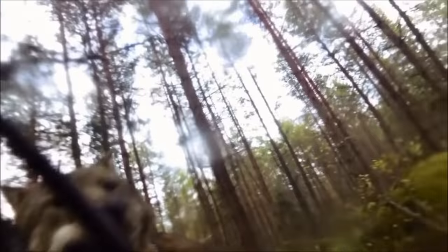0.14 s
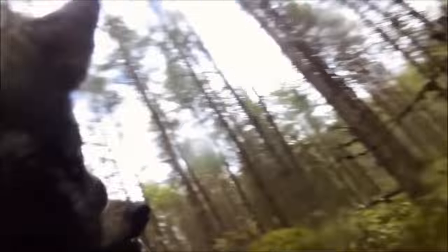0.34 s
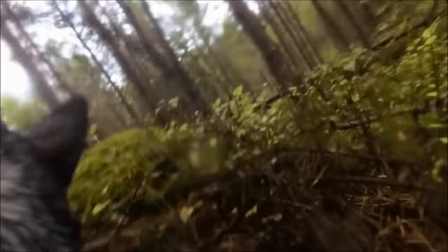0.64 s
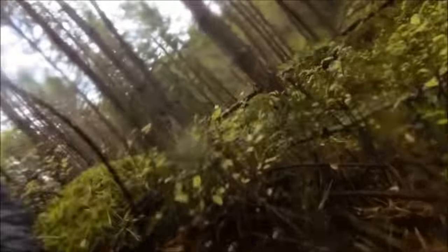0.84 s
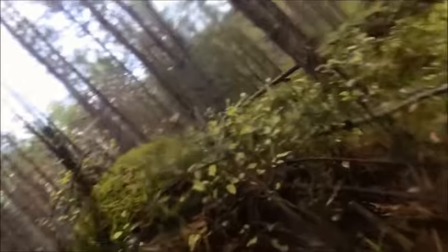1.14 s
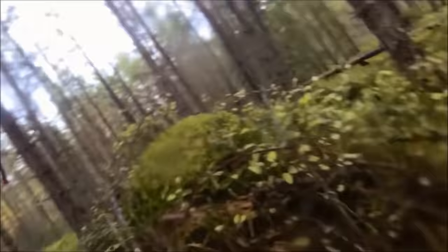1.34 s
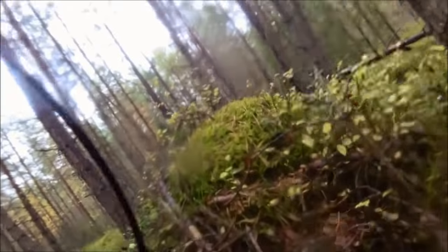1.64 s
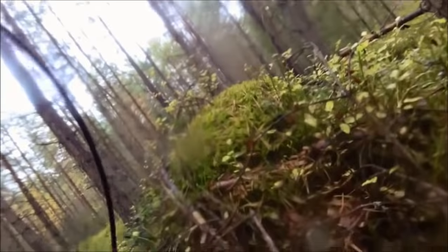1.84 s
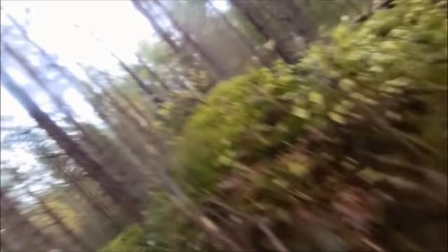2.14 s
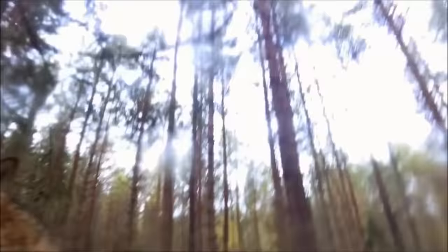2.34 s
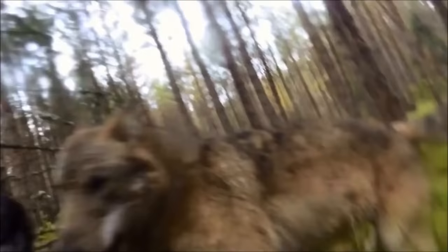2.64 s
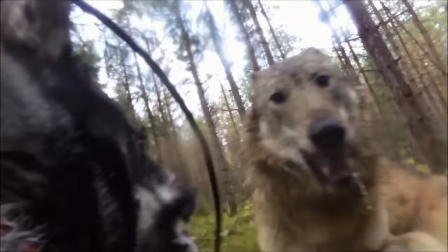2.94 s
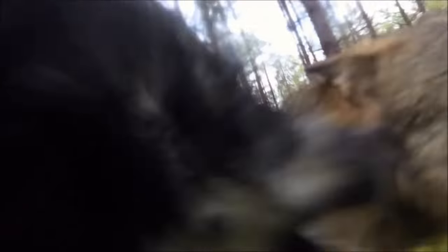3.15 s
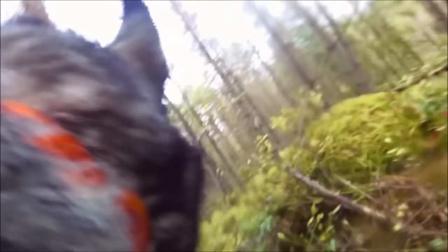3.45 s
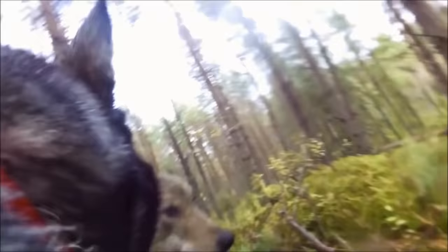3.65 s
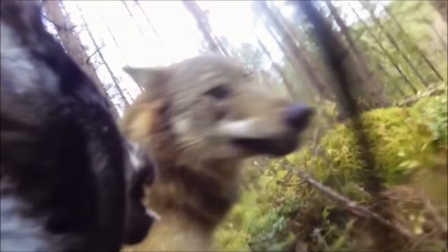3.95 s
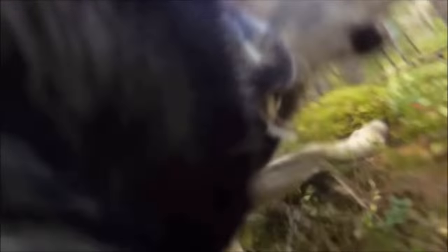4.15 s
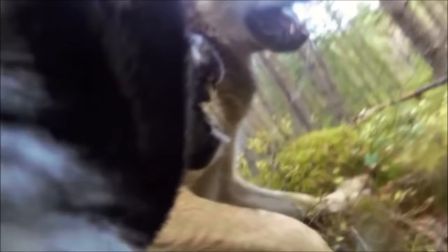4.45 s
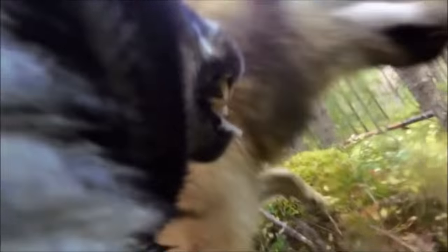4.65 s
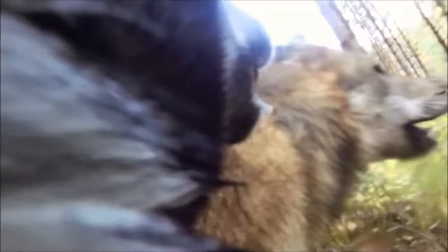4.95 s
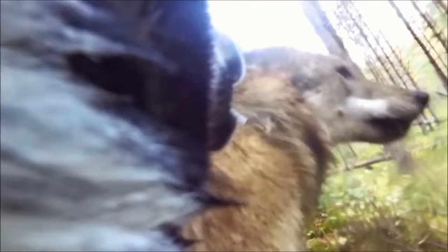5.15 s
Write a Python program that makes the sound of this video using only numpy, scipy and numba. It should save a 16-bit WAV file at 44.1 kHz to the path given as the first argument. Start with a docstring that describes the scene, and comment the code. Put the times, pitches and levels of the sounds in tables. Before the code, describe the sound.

A harness knocks and scrapes against the microphone as a dog moves through forest undergrowth, while a nearby wolf gives low, muffled growls.

```python
"""A dog's harness knocks on the case of the small camera it carries through forest undergrowth.
Blows ring the shell and back panel; paws and shoulders thump through the mount; strap, fur and
buckle rub by stick-slip friction, twigs snap and leaves crackle. A wolf close by gives three low,
muffled growls and two grunts. A fast limiter flattens the hardest knocks."""
import sys
import numpy as np
from scipy import signal
from scipy.fft import rfft, irfft
from scipy.io import wavfile
from scipy.ndimage import uniform_filter1d, minimum_filter1d
from numba import njit

SR = 44100
rng = np.random.default_rng(int(sys.argv[2]) if len(sys.argv) > 2 else 0)


def unload_wav(signal):
    """Save mono or channel-first audio to the path in sys.argv[1] as 16-bit WAV at rate SR, clipped to [-1, 1]."""
    wavfile.write(
        sys.argv[1],
        SR,
        np.round(np.clip(np.atleast_2d(signal).T, -1, 1) * 32767).astype(np.int16),
    )


N = 233447
TIME = np.arange(N) / SR

# colour of the stiff case shell: f/Hz, level/dB
SHELL = [(300, -19.5), (1800, -6.5), (2800, -3), (3250, 2.5), (3950, -1.5), (4500, -13.5), (7400, -41),
         (12000, -68)]
# colour of scraping on the case: f/Hz, level/dB
SCRAPE = [(200, -18), (1050, -10), (1450, -0.5), (2500, -4), (3300, 4.5), (4000, -1), (4700, -20.5),
          (6500, -31), (8300, -64)]
# colour of soft flesh and fur: f/Hz, level/dB
FLESH = [(110, -12), (330, 5), (800, -4.5), (4000, -42.5)]
# colour of the hollow between case and coat: f/Hz, level/dB
HOLLOW = [(150, -6), (400, 9.5), (740, -3), (1050, -11), (1450, -11), (1900, -30.5)]


def knocks(hard_db=-8, fall_power=1.32, tail_db=-32, tail_s=0.01, size=4096):
    """Each harness contact chatters for a few ms and rings the stiff shell and the broad back panel."""
    # colour of the back panel: f/Hz, level/dB
    panel_colour = [(150, -17), (1020, -12.5), (1380, 4.5), (1800, -10.5), (6000, -74.5)]
    out, t = np.zeros(N), np.arange(size) / SR
    padding = response(FLESH)
    for s, shell_db, panel_db, length_s in contacts():
        shell, panel = response(struck(SHELL)), response(struck(panel_colour))
        force = np.exp(-.5 * (t / length_s) ** fall_power) + undb(tail_db) * np.exp(-t / tail_s)
        hardness = undb(.5 * (panel_db - hard_db))  # fur cushions light blows; hard ones reach the panel
        for body, db in ((shell, shell_db), (hardness * panel + .5 * padding, panel_db)):
            ring = signal.fftconvolve(force * rng.choice([-1, 1], size), body)
            add(out, s, ring * undb(db) * np.sqrt(length_s * SR / np.sum(ring ** 2)))
    return out


def contacts(contact_s=0.0015, doubling_db=50):
    """Blows and rebounds as t/s, shell/dB, panel/dB, length/s; harder blows press for longer."""
    # harness blows: t/s, shell level/dB, panel re shell/dB, rebound delay/s (0 = none)
    blows = [(0.103, -25.5, -4.5, 0.004), (0.416, 6, -11.5, 0.0099), (0.527, 0, -15.5, 0.012),
             (0.791, -17.5, -0.5, 0.0032), (0.845, -16, -18, 0.011), (0.986, -21.5, -17, 0.00077),
             (1.204, -17, -2.5, 0.0063), (1.626, -21.5, -2, 0.0029), (1.658, -15.5, 1, 0.0058),
             (1.858, -22.5, 5, 0.0065), (2.2377, -22, 2, 0.0032), (2.5403, -22, -3, 0.01),
             (2.744, -17, -10, 0.0038), (2.9001, -4, -12.5, 0.0037), (3.254, 7, -4, 0.011),
             (3.3584, 22.5, -6.5, 0.0089), (3.4172, -7, -7.5, 0.0027), (3.493, -2, 0, 0.0084),
             (3.971, 3, -7, 0.00021), (4.2265, 0.5, -2, 0.0086), (4.2789, 1.5, -1.5, 0.015),
             (4.3712, -15, -1.5, 0.0027), (4.472, -5, -12, 0.0055), (4.4905, -13.5, -7.5, 0.00077),
             (4.5436, -2, -6, 0), (4.5625, -7.5, -4.5, 0.0087), (4.586, -24, 0, 0.0019)]
    for s, db, panel_db, delay_s in blows:
        length_s = contact_s * 2 ** (db / doubling_db)
        yield s, db, db + panel_db, length_s
        if delay_s > 0:  # a rebound lands flatter: boxier, longer
            yield s + delay_s, db, db + panel_db + 2.5, length_s * 1.193


def thumps(gain_db=-1, swell_s=0.0017, sag=0.43, scuff_db=-12, size=4000):
    """A soft push swells and dies within a few cycles, sinking in pitch as the strap slackens."""
    # paw and shoulder blows through the mount: t/s, mid-glide f/Hz, level/dB
    pushes = [(0.428, 163, -2), (0.541, 194, -13), (0.688, 464, -6), (1.203, 437, -13), (1.497, 138, -8.5),
              (1.668, 185, -2.5), (1.867, 260, -7.5), (2.318, 142.4, -4), (2.424, 225, 0),
              (2.54, 410, -5.5), (2.904, 163.1, -9.5), (3.255, 200.6, -7), (3.397, 220.5, -6.5),
              (3.976, 179.4, -10.5)]
    out, t = np.zeros(N), np.arange(size) / SR
    for s, hz, db in pushes:
        age = t / swell_s * (hz / 200) ** 0.37  # higher blows are shorter
        pitch_hz = hz * (1 + sag * (2 * np.exp(-age / 2) - 1))
        phase = 2 * np.pi * np.cumsum(pitch_hz) / SR
        scuff = undb(scuff_db) * through(rng.standard_normal(size), FLESH)
        add(out, s, undb(db + gain_db) * age * np.exp(1 - age) * (np.sin(phase) + scuff))
    return out


def snaps(gain_db=-6, decay_s=0.002, size=2048):
    """A twig splinters for a moment and rings only the stiff shell."""
    # twigs breaking against the case: t/s, level/dB
    twigs = [(0.662, -21), (0.7604, -19), (0.7657, -3.5), (1.474, -13.5), (1.5638, -15.5), (1.772, -21.5),
             (1.8, -17.5), (2.351, -11), (2.6458, -18.5), (2.704, -10.5), (3.2891, -12.5), (3.4474, -7),
             (3.5339, -7.5), (3.5442, -6.5), (3.5686, -10.5), (3.7164, -21.5), (4.152, -19)]
    out, t = np.zeros(N), np.arange(size) / SR
    for s, db in twigs:
        crack = through(rng.choice([-1, 1], size) * np.exp(-t / decay_s), struck(SHELL))
        add(out, s, undb(db + gain_db) * crack / np.sqrt(np.sum(crack ** 2) / (decay_s * SR)))
    return out


def booms(t60_s=0.077, size=6000):
    """Air trapped between case and coat rings at one hollow pitch."""
    # square blows: t/s, f/Hz, level/dB
    blows = [(3.502, 274, -7.5), (4.57, 385, -12)]
    out, t = np.zeros(N), np.arange(size) / SR
    for s, hz, db in blows:
        add(out, s, undb(db - 60 * t / t60_s) * np.sin(2 * np.pi * hz * t))
    return out


def pings(detune=.008, size=16000):
    """A struck metal harness ring sings briefly; each mode beats against a weaker twin."""
    # strikes on the ring: t/s, level/dB
    strikes = [(2.901, -38), (3.266, -32), (3.973, -31), (4.24, -38)]
    # ring modes: f/Hz, level/dB, t60/s
    modes = [(2565, -1, 0.18), (3070, 6, .12)]
    out, t = np.zeros(N), np.arange(size) / SR
    for s, db in strikes:
        for hz, mode_db, t60_s in modes:
            twin_hz = hz * (1 + detune * rng.standard_normal())
            pair = np.sin(2 * np.pi * hz * t) + .5 * np.sin(2 * np.pi * (twin_hz * t + rng.random()))
            add(out, s, undb(db + mode_db - 60 * t / t60_s) * pair)
    return out


def scrapes(rub_db=-22, shell_db=-8):
    """Gritty, uneven slips scratch the case; the coarsest tick on its shell."""
    # strap and twig strokes: crest t/s, length/s, level/dB
    scratches = [(0.44, 0.052, -24.5), (0.61, 0.051, -17), (0.728, 0.055, -38), (0.84, 0.048, -35.5),
                 (1.475, 0.039, -37), (2.329, 0.039, -30.5), (2.405, 0.032, -19), (2.461, 0.029, -17.5),
                 (3.425, 0.098, -27)]
    pressure = strokes(scratches)
    friction = bounce(slips(rate_hz=6000, spread_db=2.5) * undb(2.5 * walk(rate_hz=250)))
    ticks = through(slips(rate_hz=450, spread_db=2) * pressure, SHELL)
    rub = through(rng.standard_normal(N) * np.sqrt(pressure), HOLLOW)
    return through(friction * pressure, SCRAPE) + undb(shell_db) * ticks + undb(rub_db) * rub


def grinds(bite_s=.001, release_s=.008, ease_db=-5):
    """A buckle bites at once, judders along the case as the pressure eases, and lets go."""
    # buckle catches: start t/s, length/s, level/dB
    catches = [(3.364, 0.027, -14.5), (3.508, 0.018, -15.5), (4.314, 0.046, -13)]
    # colour of the grinding buckle: f/Hz, level/dB
    buckle_colour = [(950, -5), (1480, 4.5), (2300, -7.5), (3500, 3.5), (6400, -20), (8000, -48)]
    pressure = 0
    for s, length_s, db in catches:
        gate = np.clip(np.minimum((TIME - s) / bite_s, (s + length_s - TIME) / release_s + .5), 0, 1)
        progress = np.clip((TIME - s) / length_s, 0, 1)
        pressure = pressure + gate * undb(db + ease_db * progress ** 2)
    judder = bounce(slips(rate_hz=5000, spread_db=1.5) * undb(2 * walk(rate_hz=400)))
    return through(judder * pressure, buckle_colour)


def brushes(rub_db=-15, cutoff_hz=4400):
    """Countless soft hairs swish over the case; light strokes are mostly a dull, hollow rub."""
    # fur strokes: crest t/s, length/s, level/dB
    sweeps = [(4.517, 0.021, -31.5), (4.597, 0.041, -35), (4.722, 0.072, -17), (4.822, 0.043, -31),
              (4.955, 0.057, -27), (5.025, 0.053, -28), (5.198, 0.041, -29)]
    pressure = strokes(sweeps)
    lowpass = signal.butter(3, cutoff_hz, fs=SR, output="sos")
    hairs = signal.sosfilt(lowpass, bounce(rng.standard_normal(N)))
    rub = through(bounce(rng.standard_normal(N)) * np.sqrt(pressure), HOLLOW)
    return through(hairs * pressure, SCRAPE) + undb(rub_db) * rub


def growls(third_db=-30, slope_db=-5.5, rasp_db=-17, jitter=.02, shimmer_db=1.4, fade_s=0.015):
    """Low, muffled wolf growls with two strong harmonics; the folds flutter and rasp once a cycle."""
    # one contour per growl: t/s, f/Hz, level/dB, octave re fundamental/dB
    contours = [
        [(2.79, 143.1, -43, 1), (2.92, 126.4, -47.5, 15), (3.01, 120.6, -39, 1), (3.10, 131.4, -37.5, -2),
         (3.26, 111.5, -35.5, -4.5)],
        [(3.65, 152.1, -38.5, -16), (3.74, 141, -33.5, -4.5), (3.81, 116.7, -36, 3), (4.00, 72.4, -33, -55),
         (4.04, 68.96, -53, -38)],
        [(4.765, 124.3, -45, 8.5), (4.95, 145.1, -32.5, -0.5), (5.05, 159.9, -35, 0), (5.12, 132.1, -36, 1),
         (5.19, 155, -35.5, 0.5), (5.285, 131.5, -34, 4)],
    ]
    out = np.zeros(N)
    for contour in contours:
        knots_s, *columns = np.transpose(contour)
        hz, db, octave_db = [np.interp(TIME, knots_s, column) for column in columns]
        phase = 2 * np.pi * np.cumsum(hz * (1 + jitter * walk(rate_hz=63))) / SR
        upper = sum(undb(third_db + slope_db * k) * np.sin((k + 3) * phase) for k in range(7))
        overtones = np.sin(2 * phase) + upper + undb(rasp_db) * rasp(phase)
        voice = np.sin(phase) + undb(octave_db) * overtones
        gate = np.clip(np.minimum(TIME - knots_s[0], knots_s[-1] + fade_s - TIME) / fade_s, 0, 1)
        out += np.sqrt(2) * voice * gate * undb(db + shimmer_db * walk(rate_hz=130))
    return out


def grunts(rasp_db=-10):
    """A brief, husky hum swells and fades as its pitch slides."""
    # muffled wolf grunts: start t/s, length/s, start f/Hz, glide/(octaves per s), level/dB
    hums = [(0.857, 0.043, 302, -7, -22.5), (1.716, 0.056, 240.4, 4, -24.5)]
    out = np.zeros(N)
    for s, length_s, hz, glide, db in hums:
        t = np.arange(int(length_s * SR)) / SR
        phase = 2 * np.pi * np.cumsum(hz * 2 ** (glide * t)) / SR
        voice = np.sin(phase) + undb(rasp_db) * rasp(phase)
        add(out, s, undb(db) * np.sin(np.pi * t / length_s) * voice)
    return out


def movement(sway_db=-46.5, jolt_db=3.5, twig_db=-8):
    """The dog's body rumbles through the mount; leaves crackle in flurries and dry twigs tick."""
    # steps, lunges and weight shifts: crest t/s, length/s, rumble level/dB, leaf level/dB
    moves = [(0.028, 0.21, -40, -48), (0.447, 0.19, -25.5, -35.5), (0.753, 0.19, -20, -30.5),
             (0.984, 0.028, -24.5, -49), (1.204, 0.076, -32.5, -44), (1.485, 0.1, -24, -39),
             (1.628, 0.14, -25, -37.5), (1.832, 0.16, -27, -46.5), (2.309, 0.11, -24.5, -39),
             (2.425, 0.11, -17.5, -25.5), (2.711, 0.23, -29, -38), (3.424, 0.16, -20.5, -28.5),
             (3.592, 0.16, -31.5, -41), (3.826, 0.13, -34, -46.5), (4.182, 0.062, -32, -41.5),
             (4.537, 0.25, -38.5, -44), (5.0, 0.59, -38, -47)]
    # colour of the body rumble: f/Hz, level/dB
    rumble_colour = [(20, -15), (80, -1), (140, -5), (280, -4), (420, -15.5), (800, -20), (4000, -61.5)]
    body, leaves = undb(sway_db), 0  # the body is never quite still
    for s, length_s, body_db, leaves_db in moves:
        effort = swell(s, length_s, rise_share=0.48, sharpness=1.44)
        body = np.hypot(body, undb(body_db) * effort)
        leaves = np.hypot(leaves, undb(leaves_db) * effort)
    jolts = walk(rate_hz=130)
    rumble = unit(through(rng.standard_normal(N), rumble_colour) * undb(jolt_db * jolts))
    flurries = undb(3 * jolts + 3 * walk(rate_hz=130))
    crackle = unit((slips(rate_hz=350, spread_db=1.5) + .4 * rng.standard_normal(N)) * flurries)
    twigs = slips(rate_hz=60, spread_db=2.5)
    rustle = through(crackle * leaves, SCRAPE) + undb(twig_db) * through(twigs * leaves, SHELL)
    return rumble * body + rustle


def air(forest_db=-64, hiss_db=-73):
    """The still forest heard through the case, over faint microphone hiss."""
    forest = through(rng.standard_normal(N), SCRAPE)
    hiss = through(rng.standard_normal(N), [(4500, -3.5), (16000, -34.0)])
    return undb(forest_db) * forest + undb(hiss_db) * hiss


def struck(colour, shift=.025, spread_db=1.5):
    """Each contact lands on a new spot, which shifts and reweights the resonances a little."""
    hz, db = np.transpose(colour)
    shifted_hz = hz * (1 + shift * rng.standard_normal())
    return np.column_stack([shifted_hz, db + spread_db * rng.standard_normal(len(db))])


def strokes(table, rise_share=0.63, touch_db=-20):
    """Pressure on the case: each firm stroke rises and falls inside a lighter, longer touch of fur."""
    pressure = 0
    for s, length_s, db in table:
        firm = swell(s, length_s, rise_share, sharpness=4.5)
        touch = undb(touch_db) * swell(s, length_s, rise_share, sharpness=2)
        pressure = pressure + undb(db) * np.hypot(firm, touch)
    return pressure


def swell(s, length_s, rise_share, sharpness):
    """A gesture that builds up, peaks at 1 at time s and dies away."""
    distance = np.maximum((s - TIME) / rise_share, (TIME - s) / (1 - rise_share)) / length_s
    return np.exp(-np.minimum(distance, 20) ** sharpness)


def slips(rate_hz, spread_db):
    """Tiny stick-slip clicks of very unequal size, rms 1."""
    hit = rng.random(N) < rate_hz / SR
    return unit(hit * rng.choice([-1, 1], N) * undb(spread_db * np.minimum(rng.exponential(size=N), 4)))


def bounce(friction):
    """Slips echo along the strap, whose free length keeps changing: hollow, shifting resonances."""
    lag_s = .0013 * undb(walk(rate_hz=10))
    return unit(friction + .5 * np.interp(TIME - lag_s, TIME, friction))


def rasp(phase):
    """Noise pulsed once per vocal-fold cycle, muffled by flesh."""
    return through(rng.standard_normal(len(phase)) * (1 + np.cos(phase)) / 2, FLESH)


def response(colour, size=4096):
    """Minimum-phase, unit-energy impulse response of a colour, falling away beyond its ends."""
    hz, db = np.transpose(colour)
    bins_hz = np.arange(size // 2 + 1) * SR / size + 1
    rolloff = np.minimum(1, np.minimum(bins_hz / hz[0], hz[-1] / bins_hz)) ** 2
    gain = undb(np.interp(np.log(bins_hz), np.log(hz), db)) * rolloff
    cepstrum = irfft(np.log(gain))
    cepstrum[1:size // 2] *= 2
    cepstrum[size // 2 + 1:] = 0
    impulse = irfft(np.exp(rfft(cepstrum)))
    return impulse / np.sqrt(np.sum(impulse ** 2))


def through(x, colour):
    """Pass x through a body of that colour."""
    return signal.fftconvolve(x, response(colour))[:len(x)]


def walk(rate_hz):
    """Smooth random drift, rms 1."""
    knots = rng.standard_normal(N // 16)
    return unit(np.interp(TIME * rate_hz, np.arange(len(knots)), knots))


def add(out, s, x):
    """Mix x into out from time s."""
    i = max(0, int(s * SR))
    out[i:i + len(x)] += x[:max(0, N - i)]


def undb(db):
    """Decibels to gain."""
    return 10 ** (np.asarray(db) / 20)


def unit(x):
    """Scale to rms 1."""
    return x / np.sqrt(np.mean(x ** 2))


def scene():
    """Everything reaches one microphone inside the case."""
    wolf = growls() + grunts()
    blows = knocks() + snaps() + thumps() + booms() + pings()
    rubbing = scrapes() + brushes() + grinds()
    return (blows + rubbing + wolf + movement() + air())[None]


@njit
def peak_follower(x, decay):
    """Jumps to each peak and sinks back."""
    out, level = np.empty(len(x)), 0.
    for i in range(len(x)):
        level = max(abs(x[i]), level * decay)
        out[i] = level
    return out


def record(dry, ceiling=.98, headroom=1.3, release_s=0.0022, smooth_samples=9, cutoff_hz=15600):
    """A fast limiter holds the peaks, the input stage rounds them, and the top is cut."""
    peaks = peak_follower(dry[0], np.exp(-1 / (release_s * SR)))
    gain = ceiling / np.maximum(peaks, ceiling)
    gain = uniform_filter1d(minimum_filter1d(gain, smooth_samples), smooth_samples)
    rounded = headroom * np.tanh(dry * gain / headroom)
    return signal.sosfilt(signal.ellip(8, .2, 70, cutoff_hz, fs=SR, output="sos"), rounded)


dry = scene()
out = record(dry)
unload_wav(out)
```